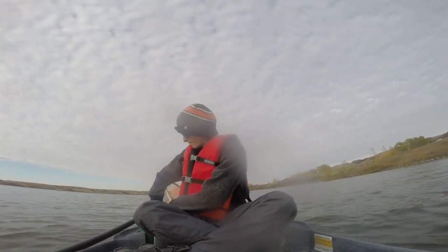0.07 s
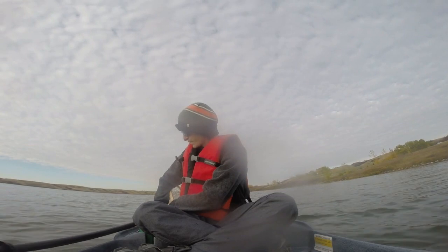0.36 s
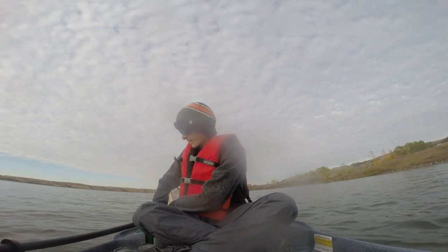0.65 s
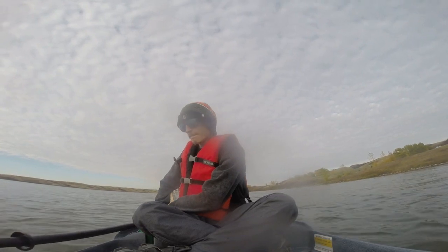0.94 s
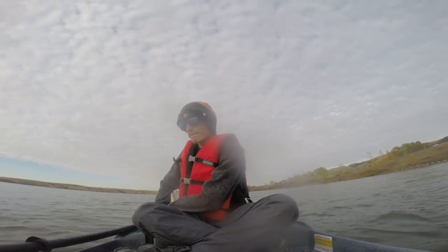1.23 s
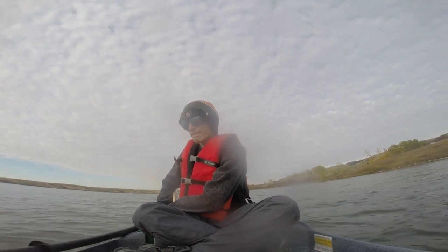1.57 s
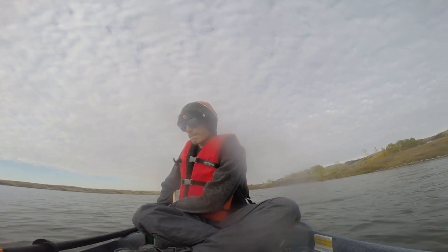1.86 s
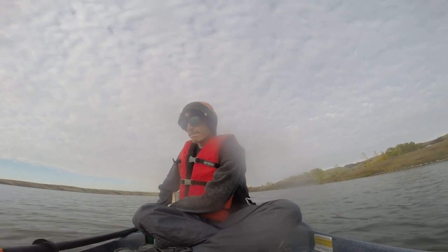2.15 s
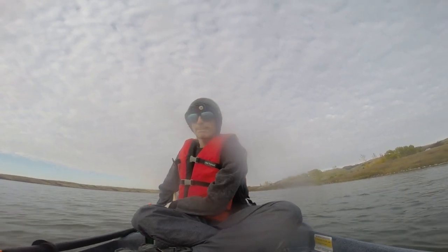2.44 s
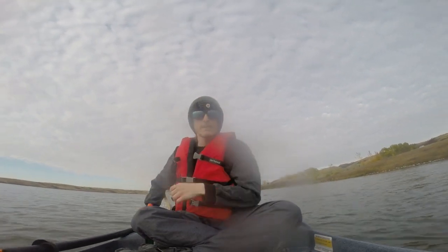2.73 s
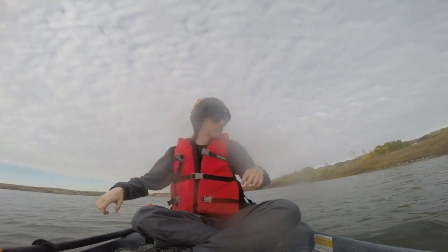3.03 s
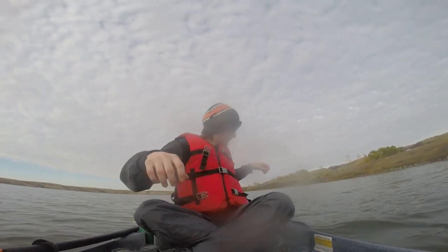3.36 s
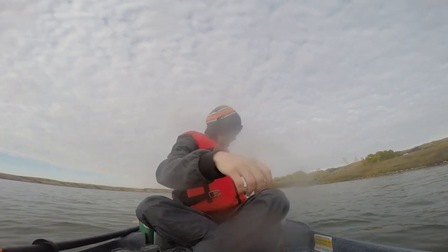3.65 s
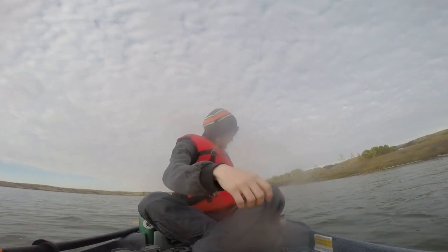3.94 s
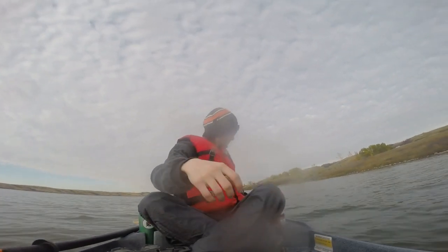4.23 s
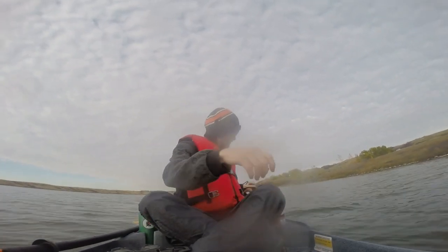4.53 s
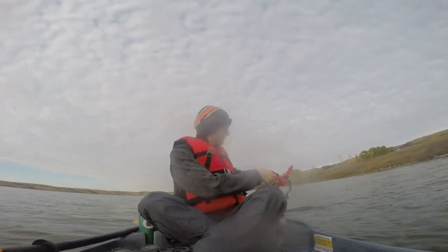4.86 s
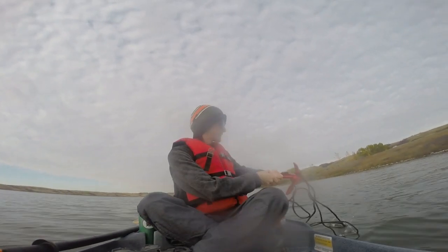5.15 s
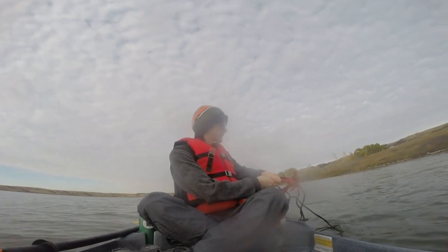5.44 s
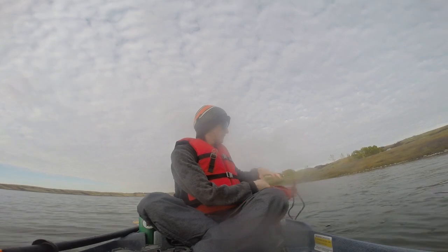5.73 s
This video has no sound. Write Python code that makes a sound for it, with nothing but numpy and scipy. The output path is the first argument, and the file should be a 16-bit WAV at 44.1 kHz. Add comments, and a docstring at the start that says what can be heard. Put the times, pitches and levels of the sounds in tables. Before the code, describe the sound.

A microphone sits close on the deck of a plastic kayak on a quiet lake. Faint low wind, gentle lapping and occasional soft bass bumps of wavelets run throughout, with a very faint hiss and thin electronic whine. From 0.2 to 0.4 seconds a paddle strikes the hull in three sharp, hollow knocks. Around 1.1 seconds its shaft bumps and scrapes over the deck, gives a tiny squeak and drops with a quick cluster of knocks at 1.5. Softer taps follow between 1.8 and 2 seconds. After a lull, the loudest clack lands at about 3.1 seconds, and a sleeve swishes across a life vest at 3.4. From 4.3 to 4.6 seconds loose gear clatters dully on the hull with a faint squeak and small metal clinks. Another clink comes near 5 seconds, then a few light ticks until about 5.8.

```python
"""On a lake, on the deck of a drifting kayak: a paddle and loose gear knock on the plastic hull.
Each blow sends bending waves through the shell and sets it ringing; the hardest paddle hits clack.
Around them the shaft scrapes, plastic squeaks, the deck ticks, a small metal piece clinks and sleeves
brush a life vest. Underneath lies a bed of low wind, lapping water and soft wavelet bumps, with a
faint high twitter and the hiss and thin electronic whine of a camera on the deck."""
import sys
import numpy as np
from scipy import signal
from scipy.fft import rfft, irfft
from scipy.io import wavfile
from scipy.ndimage import uniform_filter1d

SR = 44100
rng = np.random.default_rng(int(sys.argv[2]) if len(sys.argv) > 2 else 0)


def bounce(signal):
    """Save signal as a 16-bit WAV file at the path given by the first command-line argument."""
    frames = np.transpose(np.atleast_2d(signal))
    limited = np.clip(frames, -1, 1)
    pcm = np.round(limited * 32767).astype(np.int16)
    wavfile.write(sys.argv[1], SR, pcm)


N = 255339
TIME = np.arange(N) / SR
AGE = np.arange(SR // 2) / SR  # seconds into a one-shot

# colour of the electronic hiss: (frequency [Hz], level [dB])
HISS_SPECTRUM = [(500, -2.5), (2000, 6.5), (4000, -2.5), (6000, 2.5), (8000, -12.5), (11000, -9.5),
                 (13000, -20), (15000, -17)]
# partials of the electronic whine: (harmonic number, rms level [dB])
WHINE_HARMONICS = [(2, -69), (3, -77), (4, -77), (5, -94)]
# colour of the wind rumble: (frequency [Hz], level [dB])
WIND_SPECTRUM = [(15, -4), (30, 6), (50, 1), (75, -3.5), (110, -4.5), (160, -11), (250, -21.5), (500, -62),
                 (2000, -74), (15000, -110)]
# rise and fall of the wind: (time [s], relative level [dB])
WIND_ENVELOPE = [(0.0, -32), (0.39, -37.5), (1.45, -38.5), (1.61, -38.5), (2.48, -39), (2.63, -43.5),
                 (2.77, -46), (3.24, -35), (3.52, -40.5), (4.95, -38.5), (5.47, -46), (5.79, -41.5)]
# colour of the lapping water: (frequency [Hz], level [dB])
WATER_SPECTRUM = [(100, -2), (200, -3.5), (330, 2.5), (480, -0.5), (680, -4.5), (850, -2), (990, 2.5),
                  (1200, -8.5), (1600, -17), (2500, -32), (6000, -52), (15000, -42)]
# rise and fall of the lapping: (time [s], relative level [dB])
WATER_ENVELOPE = [(0.0, -57.5), (1.19, -56), (1.34, -56), (1.51, -57.5), (2.89, -60), (3.3, -53),
                  (3.85, -58.5), (4.58, -55.5), (5.53, -58.5), (5.79, -57.5)]
# soft bumps under the hull: (time [s], level [dB], pitch [Hz])
WAVELETS = [(0.586, -25, 54.7), (0.924, -25, 45.3), (2.113, -29.5, 54.6), (3.717, -27, 44.6),
            (4.195, -29, 61.6), (4.829, -28.5, 69.6), (5.729, -29.5, 41.4)]
# two swells of high twitter: (centre time [s], half-width [s], level [dB])
TWITTER_SWELLS = [(2.88, .13, -70), (4.39, 0.14, -67)]
# colour of a sleeve sweeping across the vest: (frequency [Hz], level [dB])
SLEEVE_SPECTRUM = [(300, -1.5), (900, -3), (1600, -3.5), (2400, -2), (3300, 3.5), (4500, -5.5), (6500, -8),
                   (9000, -23.5), (14500, -30)]
# colour of rubbing clothes: (frequency [Hz], level [dB])
CLOTH_SPECTRUM = [(400, 17.5), (1000, 12.5), (2000, 4.5), (3500, 4), (5000, -2), (7000, -5), (9000, -10.5),
                  (14500, -38)]
# arm movements that rub the clothes: (centre time [s], half-width [s], relative level [dB])
ARM_MOVES = [(.92, 0.2, -57.5), (1.32, 0.078, -50), (1.97, 0.075, -65), (2.65, 0.1, -57),
             (3.1, 0.19, -51.5), (3.52, 0.14, -52.5), (4.25, 0.17, -62), (5.0, 0.18, -61.5)]
# chirps of rubbed plastic: (time [s], level [dB], pitch [Hz], length [s])
PLASTIC_SQUEAKS = [(1.379, -36, 1630, 0.0089), (1.934, -55, 3370, 0.012), (4.328, -50, 1920, 0.069),
                   (5.315, -52.5, 2500, 0.012)]
# colour of the shaft scraping the deck: (frequency [Hz], level [dB])
SCRAPE_SPECTRUM = [(150, -3), (400, 5), (1000, 1), (1400, -5), (1800, -11), (3000, -34), (5000, -19),
                   (8000, -28), (14000, -56)]
# resonances of the paddle shaft: (frequency [Hz], bandwidth [Hz], level [dB])
SHAFT_MODES = [(1122, 32, 4), (1660, 140, -2.5), (2690, 33, -7), (3010, 62, -12), (5000, 63, -18)]
# clinks of a small metal piece: (time [s], level [dB], pitch [Hz])
METAL_CLINKS = [(4.346, -53, 4620), (4.421, -51, 4730), (5.059, -50, 4980), (5.074, -44, 4689),
                (5.204, -57.5, 4970)]
# sharp clacks of the paddle striking the hull, and small clicks on deck:
# (time [s], level [dB], frequency [Hz], t60 [s])
CLACKS_AND_TICKS = [(0.2109, -20, 1310, 0.021), (0.3061, -29, 5260, 0.041), (0.319, -38.5, 2370, 0.095),
                    (1.036, -52, 6600, 0.16), (1.213, -41, 5030, .018), (1.352, -37, 6270, 0.021),
                    (1.409, -31, 3300, 0.0063), (1.426, -36.5, 1270, 0.15), (1.435, -33, 5200, 0.037),
                    (3.083, -46.5, 3080, 0.036), (3.149, -23.5, 1950, 0.034), (5.0632, -35.5, 2340, 0.021),
                    (5.293, -49.5, 3970, .037), (5.402, -47.5, 4700, 0.022), (5.553, -53, 4500, .02),
                    (5.771, -50, 4900, 0.023)]
# distinct modes of the hull: (frequency [Hz], level [dB], base t60 [s])
HULL_MODES = [(81, -12.5, 0.29), (97.6, 3, 0.28), (106.6, -26, 0.96), (145, -3.5, 0.16), (175.7, -20.5, 1),
              (201, -4.5, 0.11), (233.8, -4.5, 0.14), (303, -5.5, 0.094), (321.6, -3.5, 0.11),
              (402.5, -13.5, 0.22), (457.4, -8.5, 0.17), (543.6, -10, 0.18), (599, -12.5, 0.2),
              (664, -5, 0.079), (711, -14.5, 0.18), (814, -11.5, 0.16), (924, -23, 0.28), (972, -9.5, 0.16),
              (1016, -4.5, 0.092), (1123, -11, 0.14), (1274, -2, 0.016), (1666, -17, 0.094),
              (1830, -9, 0.044), (2280, -21, 0.037)]
# the crowd of weaker shell modes: (frequency [Hz], level [dB], base t60 [s])
SHELL_BANDS = [(70, -3, 0.59), (138, 5.5, 0.44), (398, 10, 0.12), (660, -3, 0.21), (960, 14, 0.042),
               (1370, -4.5, 0.037), (2970, -14, 0.034), (8000, -7, 0.05)]
# colour of the contact itself: (frequency [Hz], level [dB])
CRACK_SPECTRUM = [(300, -41), (1000, 23.5), (2000, 11), (3500, 7), (5000, -14.5), (7000, -8.5), (9000, -33),
                  (14000, -59)]
# the paddle strikes the hull:
# (time [s], level [dB], contact corner [Hz], dent pitch [Hz], place along the hull [0-1])
PADDLE_HITS = [ (0.2099, -17, 2290, 705, .09), (0.3076, -25, 1840, 376, .31), (0.3808, -22, 1970, 695, .06),
               (0.504, -42.5, 1340, 500, .5), (1.087, -42, 520, 550, .29), (1.1125, -29.5, 1440, 730, .104),
               (1.154, -36.5, 520, 253, 0.4), (1.334, -39.5, 895, 514, .3), (1.439, -21.5, 920, 346, .956),
               (1.451, -25.5, 1190, 264, .36), (1.4748, -23.5, 1110, 430, 0.96),
               (1.8012, -34, 1160, 447, .3), (1.859, -32, 1250, 436, .28), (1.949, -42, 650, 325, .66),
               (2.021, -43.5, 805, 350, .36), (3.1481, -14.5, 1910, 475, .116)]
# loose gear is dragged up off the deck:
# (time [s], level [dB], contact corner [Hz], dent pitch [Hz], place along the hull [0-1])
GEAR_HITS = [ (4.318, -26, 1090, 787, .88), (4.342, -24.5, 565, 595, .88), (4.358, -25, 725, 625, .51),
             (4.3856, -19, 880, 335, .81), (4.4257, -15.5, 1050, 737, .344), (4.439, -21.5, 830, 610, .41),
             (4.593, -35, 496, 380, .35), (4.614, -37, 620, 496, .19), (4.974, -49, 1380, 616, .43),
             (5.712, -46.5, 1000, 666, .29)]


def undb(db):
    """Decibels to gain."""
    return 10 ** (np.asarray(db) / 20)


def unit(x):
    """Scale to rms 1."""
    return x / np.std(x)


def envelope(rows):
    """Gain over time from (time [s], level [dB]) rows."""
    return undb(np.interp(TIME, *np.transpose(rows)))


def fade(t60):
    """Free decay, falling 60 dB in t60 seconds."""
    return np.exp(-np.log(1000) * AGE / t60)


def swell(centre_s, half_width_s, db):
    """Bell-shaped gain that fades in and out."""
    return undb(db) * np.exp(-((TIME - centre_s) / half_width_s) ** 2)


def butter(x, hz, kind, order=2):
    """Causal low, high or band pass."""
    return signal.sosfilt(signal.butter(order, hz, kind, fs=SR, output="sos"), x)


def noise(spectrum, size=N):
    """Unit noise coloured by (frequency [Hz], level [dB]) rows."""
    hz, db = np.transpose(spectrum)
    log_hz = np.log(np.fft.rfftfreq(size, 1 / SR) + 1)
    colour = undb(np.interp(log_hz, np.log(hz), db))
    return unit(irfft(rfft(rng.standard_normal(size)) * colour, size))


def wander(rate_hz):
    """Smooth random modulation with spread 1."""
    span = int(SR / rate_hz)
    steps = np.repeat(rng.standard_normal(N // span + 1), span)
    return unit(uniform_filter1d(uniform_filter1d(steps, span), span)[:N])


def swell_tone(hz, length_s, drift):
    """A short tone that swells and dies while its pitch drifts."""
    phase = 2 * np.pi * np.cumsum(hz * (1 + drift[:len(AGE)])) / SR
    return np.sin(np.pi * np.minimum(AGE / length_s, 1)) * np.sin(phase)


def add(track, s, sound):
    """Mix a sound in at s seconds."""
    start = int(s * SR)
    track[start:start + len(sound)] += sound[:N - start]


def whine(base_hz=2926, frame_hz=29.97):
    """The camera's electronics sing a thin tone whose phase restarts with every frame."""
    phase = 2 * np.pi * base_hz * (TIME % (1 / frame_hz))
    return sum(undb(db) * unit(np.sin(k * phase)) for k, db in WHINE_HARMONICS)


def wind(trim_db=2, buffet_db=1.5):
    """Gusts buffet the microphone with a low rumble."""
    rumble = unit(noise(WIND_SPECTRUM) * undb(buffet_db * wander(20)))
    return undb(trim_db) * envelope(WIND_ENVELOPE) * rumble


def water(trim_db=5, ripple_db=1):
    """Ripples wash along the hollow hull."""
    wash = unit(noise(WATER_SPECTRUM) * undb(ripple_db * wander(22.3)))
    return undb(trim_db) * envelope(WATER_ENVELOPE) * wash


def wavelets(length_s=0.044, pitch_drift=0.13):
    """Each wavelet pushes the hull through a few slow cycles: a soft bass bump."""
    out = np.zeros(N)
    for s, db, hz in WAVELETS:
        add(out, s, undb(db) * swell_tone(hz, length_s, pitch_drift * wander(41)))
    return out


def twitter(hz=9700, width_hz=1400, pulse_hz=24):
    """A narrow, airy band of noise that pulses quickly and unevenly."""
    band = unit(butter(rng.standard_normal(N), [hz - width_hz / 2, hz + width_hz / 2], "band"))
    pulses = np.sin(np.pi * pulse_hz * TIME + 2 * wander(8.5)) ** 2
    flicker = undb(2 * wander(20))
    return sum(swell(*burst) for burst in TWITTER_SWELLS) * band * pulses * flicker


def clothes(grain_db=1.4, catch_db=2, rest_db=-59.5, rub_trim_db=-3):
    """Nylon catches and slips on its weave, never quite still; a sleeve sweeps once across the vest."""
    weave = undb(grain_db * wander(500))
    catches = undb(catch_db * wander(45))
    motion = undb(rest_db) + sum(swell(*move) for move in ARM_MOVES)
    sweep = swell(centre_s=3.394, half_width_s=0.042, db=-41.5) * noise(SLEEVE_SPECTRUM)
    rustle = undb(rub_trim_db) * catches * motion * noise(CLOTH_SPECTRUM)
    return weave * (sweep + rustle)


def squeaks(pitch_jitter=0.053):
    """Plastic sticks and slips for a moment at an unsteady rate."""
    out = np.zeros(N)
    for s, db, hz, length_s in PLASTIC_SQUEAKS:
        add(out, s, undb(db) * swell_tone(hz, length_s, pitch_jitter * wander(500)))
    return out


def shaft_scrape(peak_s=1.25, end_s=1.44, peak_db=-50.5, grit_db=5, catch_db=-0.5, ring_db=-3):
    """The paddle shaft drags over the textured deck in tiny, uneven slips, which ring it."""
    # pressure builds, holds, then lets go as the shaft drops against the hull
    rise_db_per_s, release_db_per_s = 37, 250
    attack_db = rise_db_per_s * np.minimum(TIME - peak_s, 0)
    release_db = release_db_per_s * np.minimum(end_s - TIME, 0)
    slips = undb(grit_db * wander(350) + catch_db * wander(55.8))
    friction = slips * rng.standard_normal(N)
    ring = sum(undb(db) * butter(friction, [hz - width / 2, hz + width / 2], "band", order=1)
               for hz, width, db in SHAFT_MODES)
    scrape = unit(noise(SCRAPE_SPECTRUM) * slips)
    return undb(peak_db + attack_db + release_db) * (scrape + undb(ring_db) * unit(ring))


def clinks(t60=0.17, attack_s=0.0047):
    """A small metal piece rings with one pure ping at each touch."""
    out = np.zeros(N)
    for s, db, hz in METAL_CLINKS:
        add(out, s, undb(db) * np.sin(2 * np.pi * hz * AGE) * (fade(t60) - fade(attack_s)))
    return out


def clacks_and_ticks(top_hz=5700):
    """Sharp clacks of the paddle on the hull and small clicks on deck, each one broad resonance."""
    out = np.zeros(N)
    for s, db, hz, t60 in CLACKS_AND_TICKS:
        grain = unit(butter(rng.standard_normal(len(AGE)), [hz * 0.7, hz * 1.18], "band", order=1))
        add(out, s, undb(db) * butter(grain, top_hz, "low") * fade(t60))
    return out


def shell_ring(ring_scale):
    """Crowded shell modes blur into half-octave noise bands; the bass outlasts the treble."""
    hz, db, t60 = np.transpose(SHELL_BANDS)
    out = 0
    for centre in 70 * 2 ** np.arange(0, 7.5, .5):
        band = butter(rng.standard_normal(len(AGE)), [centre / 2 ** .25, centre * 2 ** .25], "band")
        band_db = np.interp(np.log(centre), np.log(hz), db)
        band_t60 = np.interp(np.log(centre), np.log(hz), t60)
        out = out + band * undb(band_db) * fade(band_t60 * ring_scale)
    return out


def bending_waves(x, lag_s=0.001169):
    """High bending waves outrun low ones and smear the attack; lag_s is the delay at 1 kHz."""
    hz = np.fft.rfftfreq(2 * len(x), 1 / SR)
    dispersion = np.exp(-4j * np.pi * lag_s * np.sqrt(1000 * hz))
    return irfft(rfft(x, 2 * len(x)) * dispersion)[:len(x)]


def knock(corner_hz, dent_hz, place, boom_db, dent_db, crack_db, ring_scale, shell_db=4):
    """One blow: the wall dents under the contact and the hull rings in the modes that move there."""
    # a harder contact booms less and flexes the wall more sharply
    hardness = np.log2(corner_hz / 1000)  # octaves above 1 kHz
    boom_gain = undb(boom_db - 7.5 * hardness)
    dent_gain = undb(dent_db + 2 * hardness)
    modes = sum(undb(db) * np.cos(np.pi * k * place) * np.sin(2 * np.pi * hz * AGE)
                * fade(t60 * ring_scale) for k, (hz, db, t60) in enumerate(HULL_MODES))
    dent = np.sqrt(2) * np.sin(2 * np.pi * dent_hz * AGE) * fade(t60=0.028)
    body = modes + undb(shell_db) * shell_ring(ring_scale) + dent_gain * dent
    body = body + (boom_gain - 1) * butter(body, 460, "low", order=1)  # bass shelf
    body = butter(body, corner_hz, "low", order=3)  # a soft push cannot drive the fast modes
    body = butter(body, 71, "high")  # the hull is too small to radiate the deepest bass
    snap_and_tail = fade(t60=0.028) + undb(-19) * fade(t60=0.49)
    crack = butter(noise(CRACK_SPECTRUM, len(AGE)) * snap_and_tail, 10600, "low")
    return bending_waves(body + undb(crack_db) * crack)


def gear_knocks():
    """Loose gear clatters on the hull, with less boom and crack than the paddle and a longer ring."""
    out = np.zeros(N)
    voicing = dict(boom_db=-8, dent_db=5, crack_db=-23, ring_scale=1.24)
    for s, db, corner_hz, dent_hz, place in GEAR_HITS:
        add(out, s, undb(db) * knock(corner_hz, dent_hz, place, **voicing))
    return out


def paddle_knocks(settle_s=0.014, settle_db=-19):
    """The paddle hits the hull with a hollow boom, then settles with a soft, dull second bump."""
    out = np.zeros(N)
    voicing = dict(boom_db=2.5, dent_db=1.5, crack_db=-13, ring_scale=0.94)
    for s, db, corner_hz, dent_hz, place in PADDLE_HITS:
        add(out, s, undb(db) * knock(corner_hz, dent_hz, place, **voicing))
        bump = knock(corner_hz=358, dent_hz=131, place=place, **voicing)
        add(out, s + settle_s, undb(db + settle_db) * bump)
    return out


def scene():
    """The mono mix at the deck: impacts up front, small details around them, the lake underneath."""
    impacts = paddle_knocks() + gear_knocks() + clacks_and_ticks()
    details = clinks() + shaft_scrape() + squeaks() + clothes()
    bed = twitter() + wavelets() + wind() + water()
    return (impacts + details + bed)[None]


def record(dry, hiss_db=-66, top_hz=14900):
    """The camera adds its whine and hiss and cuts the top end steeply."""
    wet = dry + whine() + undb(hiss_db) * noise(HISS_SPECTRUM)
    return signal.sosfilt(signal.ellip(8, .2, 70, top_hz, fs=SR, output="sos"), wet)


dry = scene()
out = record(dry)
bounce(out)
```